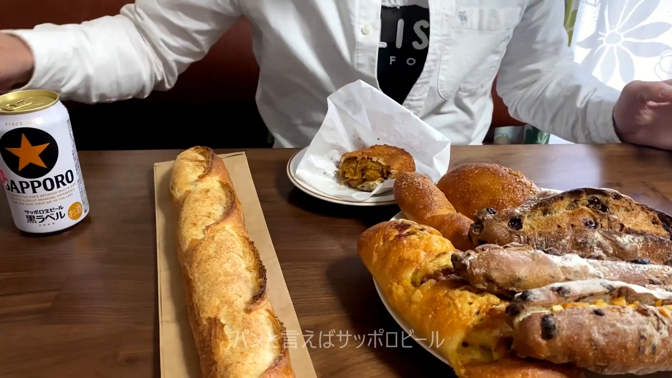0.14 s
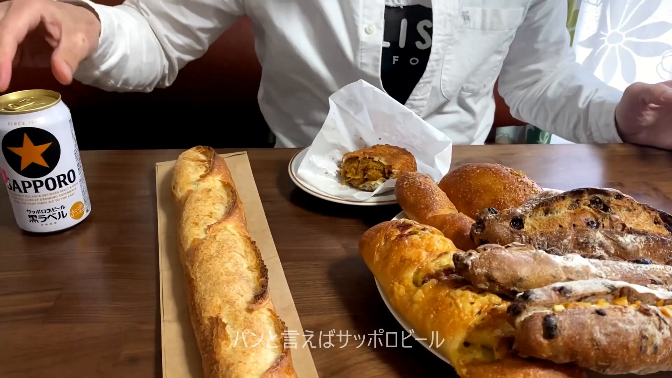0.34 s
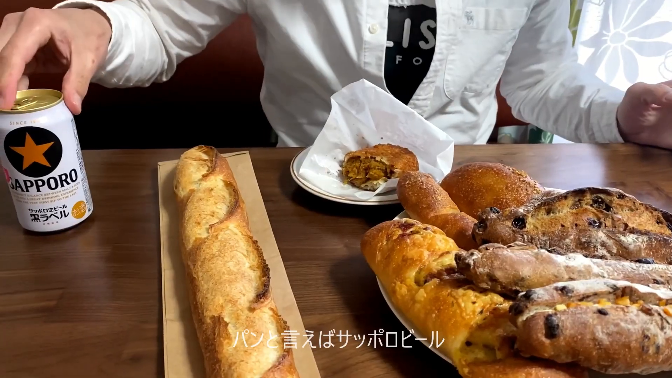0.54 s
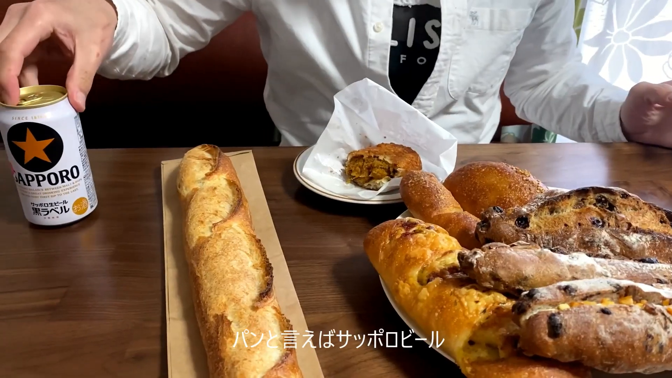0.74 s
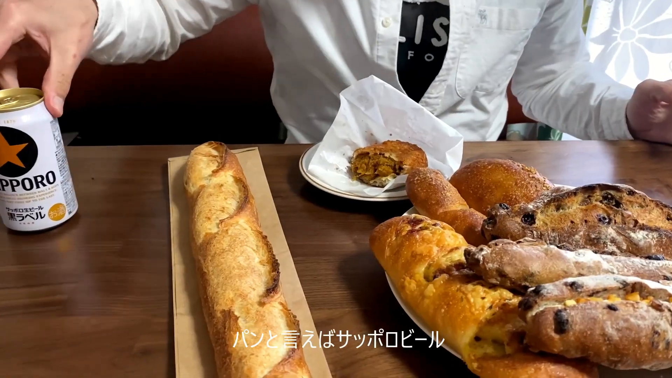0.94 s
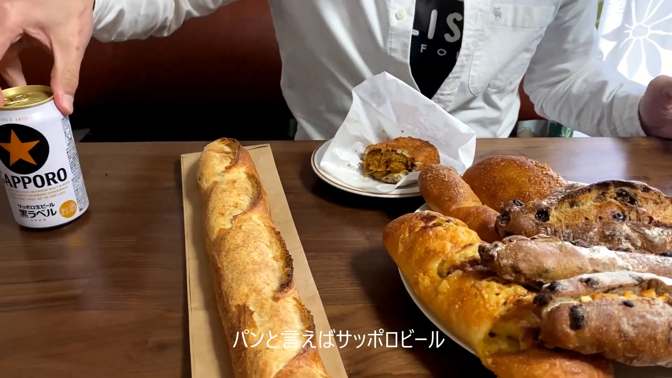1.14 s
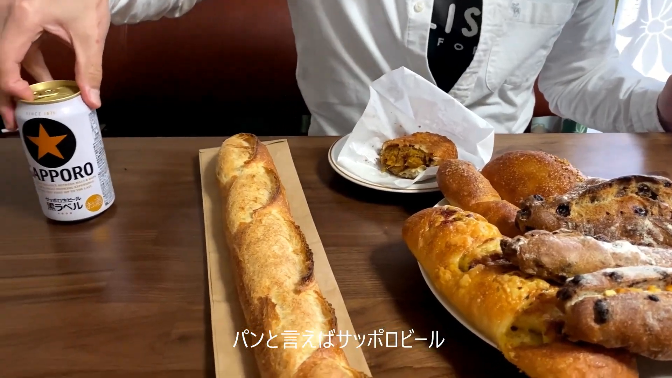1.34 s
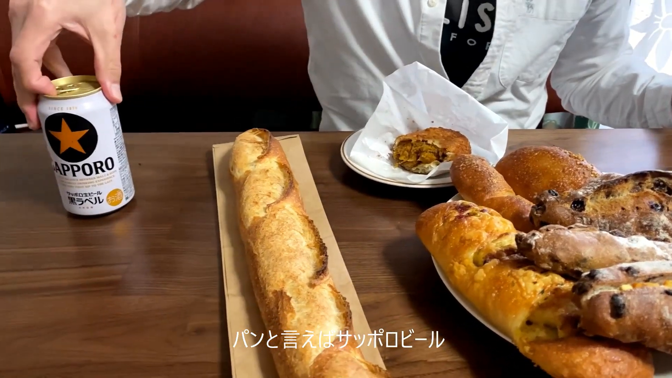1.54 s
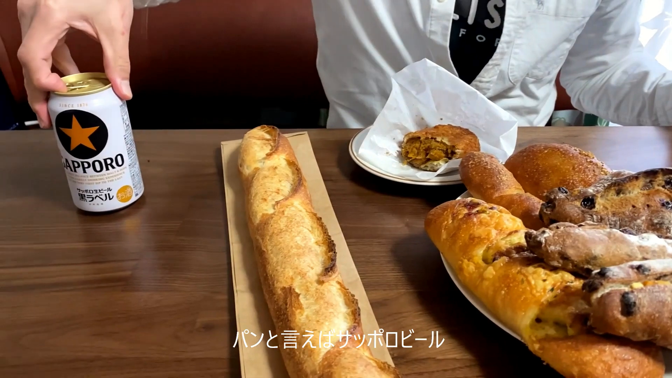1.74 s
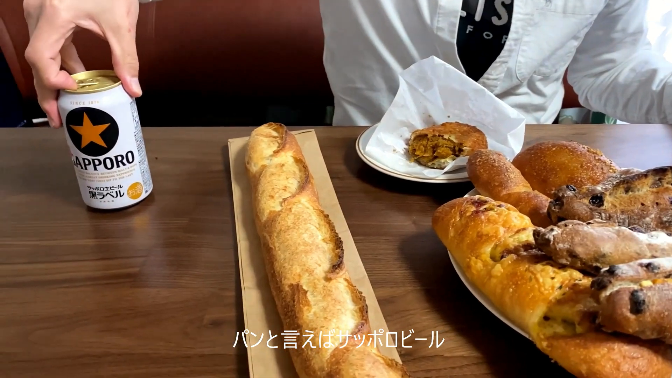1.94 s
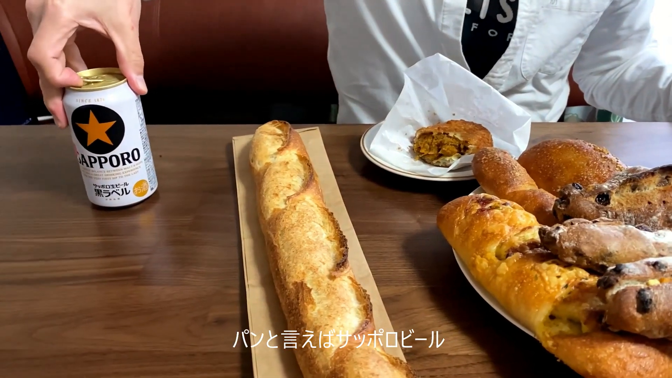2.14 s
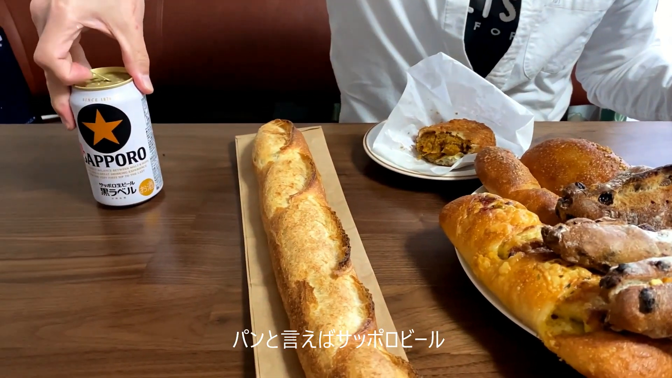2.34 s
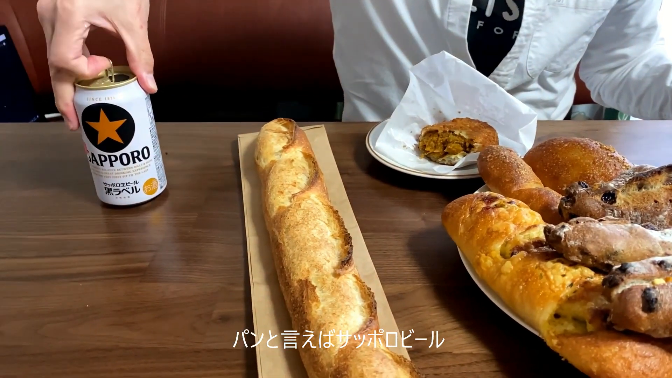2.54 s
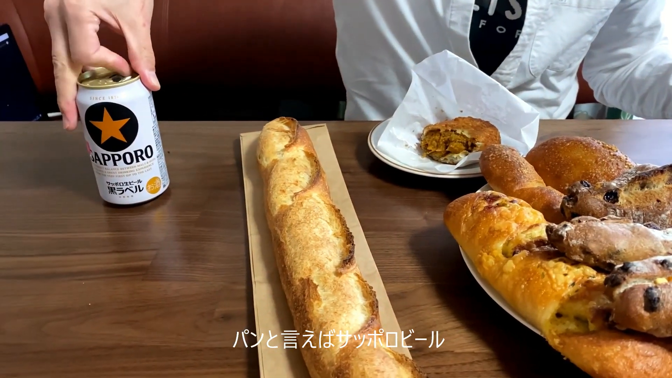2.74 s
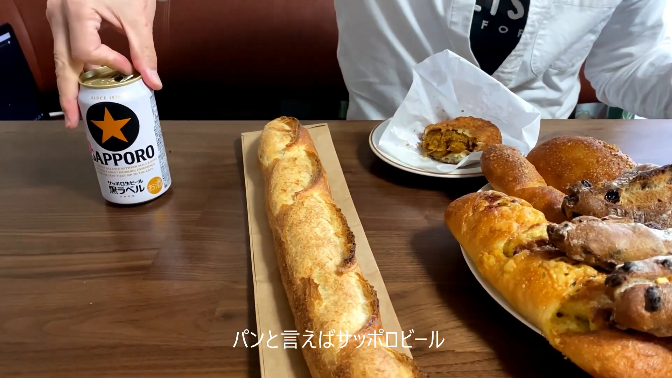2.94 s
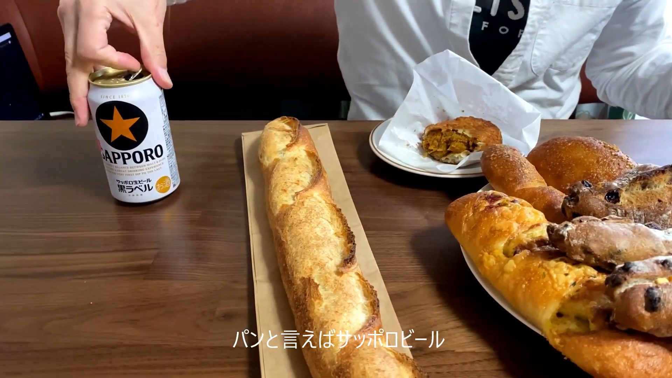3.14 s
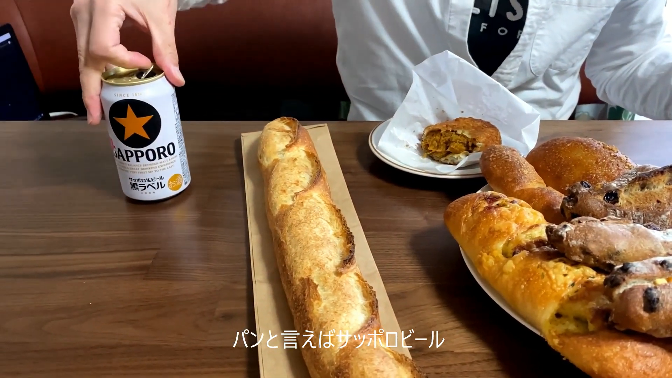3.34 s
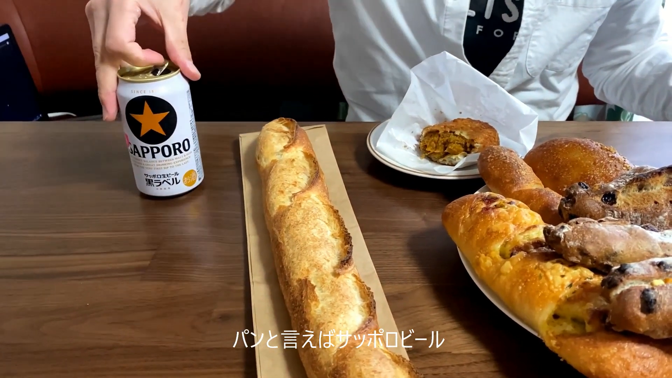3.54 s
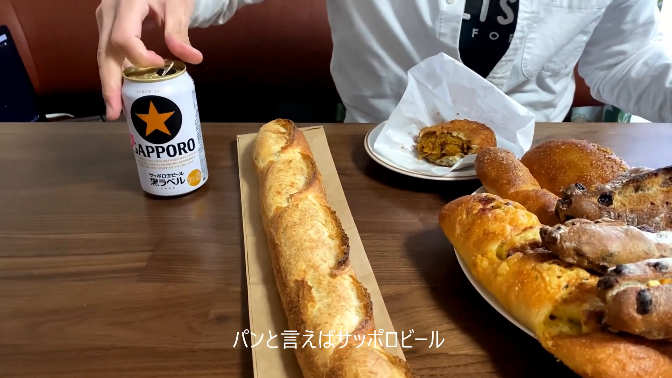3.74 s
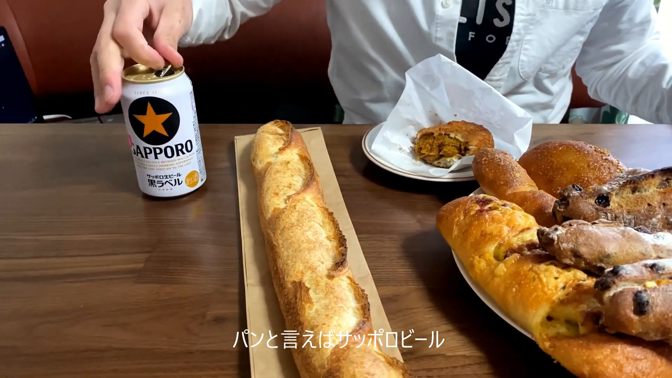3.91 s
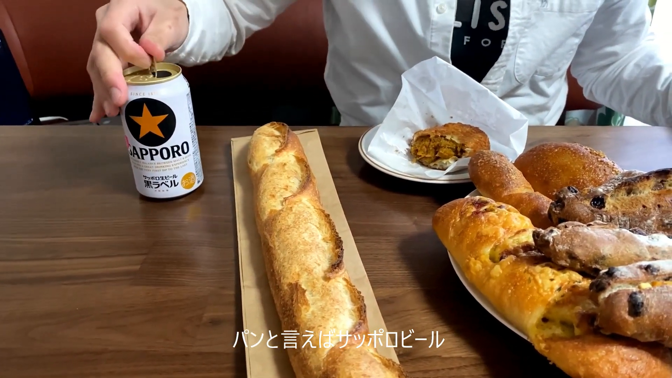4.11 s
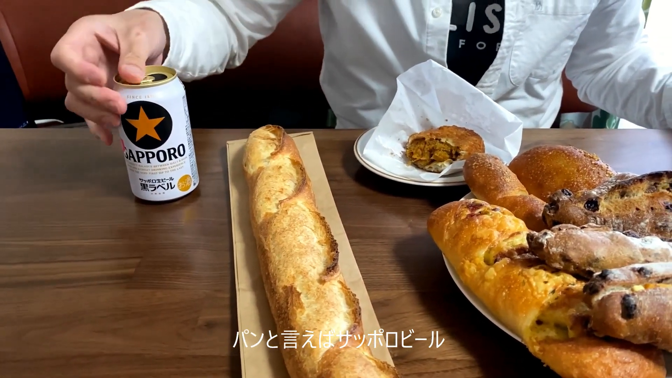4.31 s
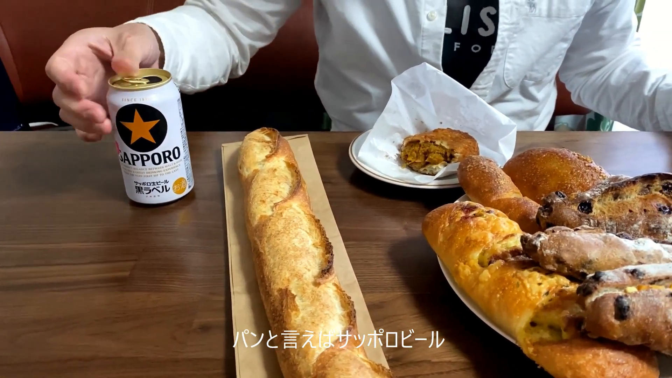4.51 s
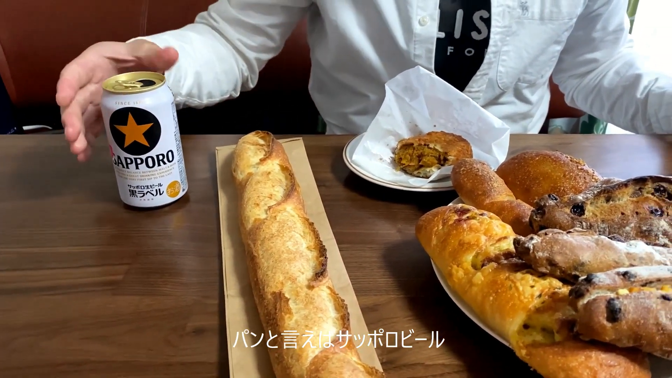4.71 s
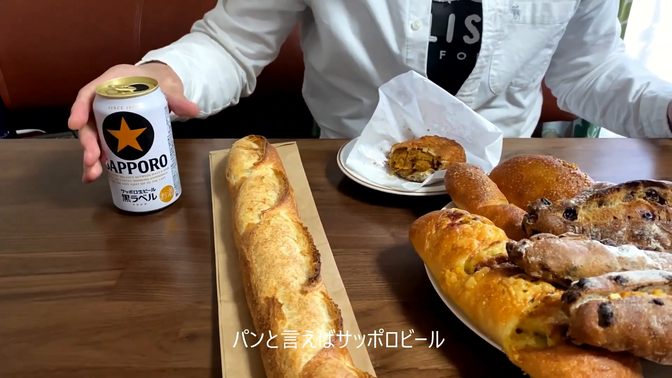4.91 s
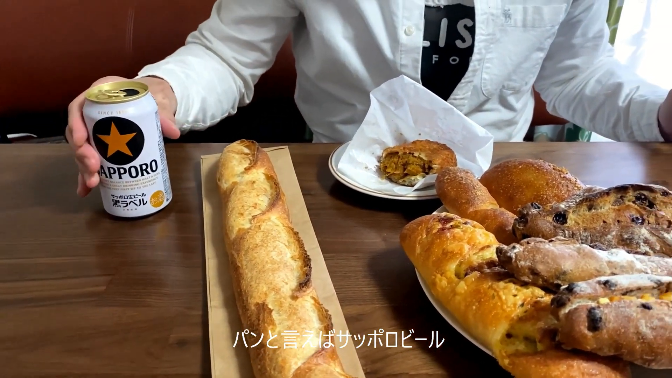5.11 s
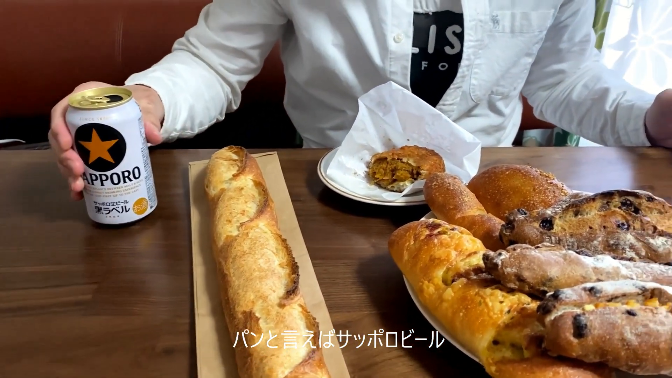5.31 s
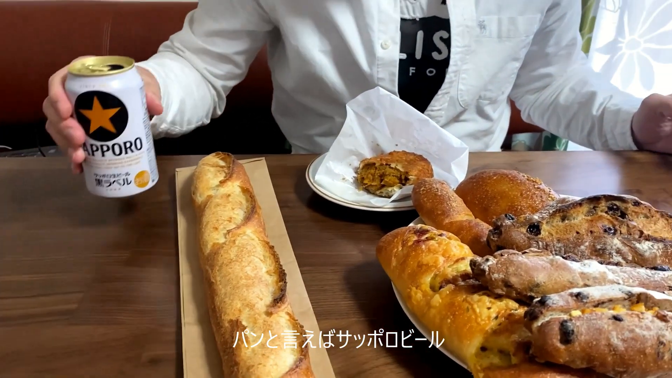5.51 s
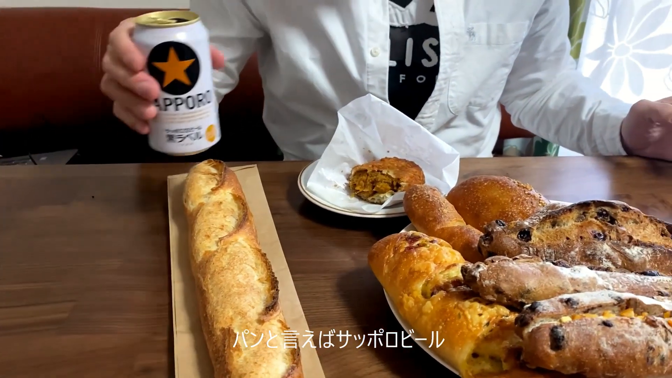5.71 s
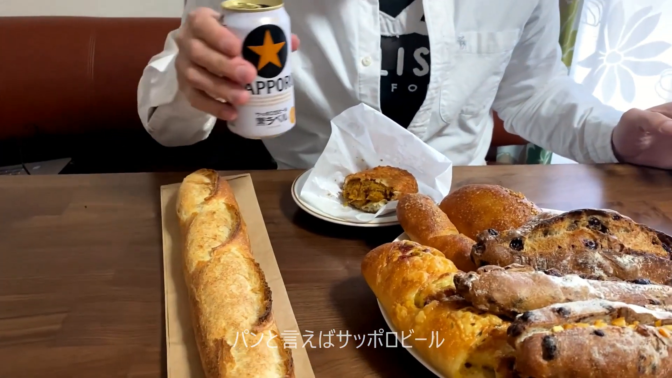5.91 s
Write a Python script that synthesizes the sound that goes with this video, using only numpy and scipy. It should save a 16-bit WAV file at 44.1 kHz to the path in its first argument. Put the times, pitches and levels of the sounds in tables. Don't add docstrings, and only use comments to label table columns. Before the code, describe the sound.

A full drinks can is handled on a wooden table in a small quiet room. Light ticks and a short gritty scrape come first, then soft thumps. The tab ticks, a very brief hiss bursts out, and the lid cracks twice with a ringing metallic snap and a table thud. A faint slide, finger taps and a small click follow. Close stereo phone microphone.

```python
import sys
import numpy as np
from scipy import signal
from scipy.fft import rfft, irfft
from scipy.io import wavfile
from scipy.ndimage import uniform_filter1d

SR = 44100
rng = np.random.default_rng(int(sys.argv[2]) if len(sys.argv) > 2 else 0)


def volts_from_db(level):
    exponent = np.asarray(level, float) / 20
    return 10 ** exponent


def inscribe(sig):
    pcm = np.round(np.clip(np.atleast_2d(sig).T, -1, 1) * 32767)
    wavfile.write(sys.argv[1], SR, pcm.astype(np.int16))


N = 267157


def unit(x):
    return x / np.sqrt(np.mean(x ** 2))


def unit_energy(x):
    return x / np.sqrt(np.sum(x ** 2))


def band(x, hz, width_hz):
    return signal.lfilter(*signal.iirpeak(min(hz, 0.45 * SR), hz / width_hz, SR), x)


def cut(x, lo_hz, hi_hz):
    return signal.sosfilt(signal.butter(3, [lo_hz, hi_hz], "band", fs=SR, output="sos"), x)


def colour(x, points):
    hz, db = np.transpose(points)
    log_f = np.log(np.arange(N // 2 + 1) * SR / N + 1)
    return irfft(rfft(x) * volts_from_db(np.interp(log_f, np.log(hz), db)), N)


def curve(s, db):
    return volts_from_db(np.interp(np.arange(N) / SR, s, db, left=-150, right=-150))


def walk(rate_hz):
    hold = int(SR / rate_hz)
    steps = np.repeat(rng.standard_normal(N // hold + 1), hold)
    return 1.6 * uniform_filter1d(uniform_filter1d(steps, hold), hold)[:N]


def add(out, s, x):
    i = int(s * SR)
    out[i:i + len(x)] += x[:N - i]


def ring(modes, size=8192):
    t = np.arange(size) / SR
    return unit_energy(sum(volts_from_db(db - 60 * t / t60_s) * np.sin(2 * np.pi * hz * t) for hz, db, t60_s in modes))


def burst(ms, size=1024):
    sign, spread = rng.standard_normal((2, size))
    decay = np.exp(-np.arange(size) / (ms * SR / 1000))
    return unit_energy(sign * volts_from_db(2.1 * spread) * decay)


def strike(ms, modes, spread=0.045, count=5):
    out = 0
    for hz, db, t60_s in modes:
        detune = rng.standard_normal((count, 2))
        crowd = ring([(hz * (1 + spread * a), 3 * b, t60_s) for a, b in detune], size=2560)
        out = out + volts_from_db(db) * unit_energy(signal.fftconvolve(burst(ms), band(crowd, hz, hz * 0.61)))
    return out


def snap(ms):
    edge = cut(burst(ms), 4800, 17000)
    return edge + 1.2 * band(edge, 8700, 4300)


def stroke(start, end, start_db, end_db, rise_db_s, fall_db_s):
    times_s = [start - 60 / rise_db_s, start, max(end, start + 1 / SR), end + 60 / fall_db_s]
    return curve(times_s, [start_db - 58, start_db, end_db, end_db - 60.5])


def glide(points, waver_hz):
    s, hz, db = np.transpose(points)
    phase = 2 * np.pi * np.cumsum(np.interp(np.arange(N) / SR, s, hz)) / SR
    return curve(s, db) * walk(waver_hz) * np.sin(phase)


def air():
    # f/Hz, density/dB
    air_spectrum = [(20, -30.5), (50, -3), (102, -16.5), (256, -13), (480, -22), (2550, -30), (3000, -38),
                    (16000, -57.5)]
    hiss = np.array([colour(rng.standard_normal(N), air_spectrum) for _ in range(2)])
    tone = volts_from_db(-65.5) * unit(hiss)
    bass_gain = volts_from_db(2.5 * walk(9) - 1.5)
    return tone + (bass_gain - 1) * cut(tone, 32, 600)


def arm():
    # centre t/s, spread/s, level/dB
    arm_leans = [
        (0, 0.11, -70.5),
        (0.588, 0.069, -65),
        (1.04, 0.088, -63.5),
        (1.47, 0.084, -52.5),
        (2.63, .16, -54),
        (3.35, .2, -68.5),
        (4.3, 0.34, -67),
    ]
    t = np.arange(N) / SR
    weight = volts_from_db(-73)
    for s, spread_s, db in arm_leans:
        weight = weight + volts_from_db(db) * np.exp(-0.5 * ((t - s) / spread_s) ** 2)
    return weight * unit(cut(rng.standard_normal(N), 35, 160))


def ticks():
    # t/s, peak/dB, ring f/Hz, bright crack re peak/dB, t60/s
    tick_table = [(0.4542, -46, 2150, -31, 0.017), (0.5237, -45.5, 2950, -22, 0.043),
                  (.6673, -45.5, 3820, 3, 0.018), (0.7353, -47, 4060, -7, .014),
                  (1.147, -65, 4750, 0, 0.0089), (2.262, -56, 1980, -35, .015),
                  (2.287, -65, 4000, -30, .02), (2.3014, -30, 3679, -20, .05),
                  (3.3543, -51, 1620, -27, .02), (3.9472, -48.5, 2910, -11, 0.016),
                  (4.2095, -52, 1400, -29.5, 0.018), (4.4347, -46.5, 1100, 10.5, 0.06),
                  (4.4436, -48.5, 2800, -5, .003), (4.49, -47.5, 2600, -25, .012),
                  (4.4951, -52, 3080, -25, 0.0072), (4.5005, -45.5, 2740, -14, 0.011),
                  (4.5, -42.5, 4120, -18, 0.043), (4.5704, -72, 3940, -1, .015),
                  (4.6133, -39.5, 940, -22.5, 0.15), (4.6120, -57.5, 3315, -22, 0.068),
                  (5.1117, -51, 1498, -9, 0.0056), (5.1117, -64, 3500, -20, 0.0051),
                  (3.953, -50, 1200, -30, 0.059), (5.9624, -47, 702, -28, 0.03)]
    out = np.zeros(N)
    for s, db, hz, bright_db, t60_s in tick_table:
        wall = [(hz, 0, t60_s), (hz * 0.75, -4, t60_s * 0.4),
                (hz * 0.33, -14, t60_s * 0.15), (hz * 1.24, -7, t60_s * 0.2)]
        add(out, s, volts_from_db(db + 12.5) * strike(0.801, wall, spread=0.014, count=3))
        add(out, s, volts_from_db(db + bright_db + 10) * snap(1.0))
    return out


def scrape():
    # f/Hz, width/Hz, level/dB
    scrape_peaks = [
        [(2918, 650, 0), (3830, 190, -9.5), (4940, 840, -5.5), (5782, 1500, -14.5)],
        [(1186, 190, 2), (1476, 310, 4), (1850, 220, -1), (2306, 370, 0)],
        [(7190, 1300, 0.013), (10230, 3630, 1), (14670, 2500, -0.47)],
        [(230, 160, -2.5), (347.5, 40, -2.5), (455.4, 97, -1), (687, 180, -4)],
    ]
    grains = rng.standard_normal((4, N)) * volts_from_db(2.0 * rng.exponential(size=(4, N))) * volts_from_db(1.1 * walk(40))
    parts = []
    for g, peaks in zip(grains, scrape_peaks):
        parts.append(unit(sum(volts_from_db(db) * band(band(g, hz, w), hz, w) / np.sqrt(w) for hz, w, db in peaks)))
    return parts


def drags(wall, lid, grit, table):
    # start t/s, end t/s, start level/dB, end level/dB, weight on table/dB
    drag_strokes = [
        (0.696, 0.761, -75, -72.5, 2.5),
        (0.937, 1.038, -62.5, -60.5, -0.5),
        (1.34, 1.509, -83.5, -78, 8),
        (3.169, 3.641, -79.5, -70, 3.5),
    ]
    rise_db_s, fall_db_s = 315, 199
    lid_db, grit_db, table_db = 5, -2, 13
    slow_grit_db_s = -14.5
    out = np.zeros(N)
    for start, end, start_db, end_db, weight_db in drag_strokes:
        body = wall + volts_from_db(lid_db) * lid
        body = body + volts_from_db(grit_db + slow_grit_db_s * (end - start)) * grit
        body = body + volts_from_db(table_db + weight_db) * table
        out += stroke(start, end, start_db, end_db, rise_db_s, fall_db_s) * body
    return out


def flicks():
    # t/s, peak/dB, centre f/Hz
    flick_table = [(1.1468, -41.5, 12000), (1.822, -62, 9000), (1.832, -68, 7000), (1.841, -63, 9000),
                   (2.024, -69, 9000), (2.050, -60.5, 8000), (2.067, -62.5, 8000), (2.078, -66.5, 10000),
                   (4.040, -65, 10000), (4.571, -69, 8000), (6.012, -62, 5980), (6.016, -47, 11100)]
    out = np.zeros(N)
    for s, db, hz in flick_table:
        add(out, s, volts_from_db(db + 16) * band(cut(burst(0.76), 4500, 17000), hz, hz * 1.1))
    return out


def knocks():
    # t/s, peak/dB, f/Hz, t60/s
    knock_table = [(1.329, -43.5, 72.5, 0.048), (1.36, -44, 101, 0.045), (1.404, -38, 112, 0.093),
                   (1.491, -42.5, 97, 0.057), (1.539, -43.5, 101.6, 0.07), (1.99, -52.5, 141, 0.13),
                   (2.098, -41.5, 103, 0.13), (2.315, -43.5, 95, 0.16), (2.361, -46, 214.5, 0.14),
                   (2.52, -39, 135.3, 0.3), (2.58, -21.5, 128, 0.13), (2.585, -32, 283.8, .2),
                   (4.613, -53, 416, 0.065), (2.817, -42, 181.3, 0.069), (2.838, -38, 114.9, 0.0754),
                   (2.974, -46, 62.3, 0.076), (4.622, -48.5, 110, 0.067), (5.106, -55.5, 194, 0.07),
                   (5.444, -56.5, 190.1, 0.072), (5.96, -57, 201.4, 0.084)]
    out, push = np.zeros(N), np.hanning(200)
    for s, db, hz, t60_s in knock_table:
        modes = [(hz, 0, t60_s), (hz * 0.68, -6, t60_s), (hz * 1.7, -8, t60_s * 0.55)]
        thud = signal.fftconvolve(push, ring(modes))
        add(out, s, volts_from_db(db + 3.5) * thud / np.abs(thud).max())
    return out


def rubs(wall, lid, grit, table):
    # start t/s, end t/s, level/dB, brightness/dB
    rub_strokes = [
        (1.95, 1.969, -90.5, -10),
        (2.272, 2.31, -91, -10),
        (3.712, 3.727, -63, -0.5),
        (3.97, 4.149, -85.5, -1),
        (4.193, 4.237, -78, 2),
        (4.451, 4.485, -83, 14),
        (4.601, 4.625, -76, 6),
        (5.887, 5.89, -85.5, -4),
        (5.967, 5.987, -106, -19),
    ]
    rise_db_s, fall_db_s = 499.5, 350.5
    lid_db, grit_db, table_db = 11, -11, 7.5
    out = np.zeros(N)
    for start, end, db, bright_db in rub_strokes:
        body = wall + volts_from_db(lid_db - bright_db) * lid
        body = body + volts_from_db(grit_db + bright_db) * grit
        body = body + volts_from_db(table_db - bright_db) * table
        out += stroke(start, end, db, db, rise_db_s, fall_db_s) * body
    return out


def jet():
    # t/s, level/dB
    jet_envelope = [
        (2.300, -70),
        (2.312, -53),
        (2.318, -29),
        (2.34, -24),
        (2.366, -19),
        (2.376, -39),
        (2.39, -51.5),
        (2.41, -79.5),
    ]
    # f/Hz, level/dB
    jet_spectrum = [(500, -24.5), (2000, -21), (4000, -20.5), (6500, -5.5), (8500, -6.5), (11000, -1),
                    (15000, -2.5), (17000, -18.5)]
    gas = unit(colour(rng.standard_normal(N), jet_spectrum))
    return curve(*np.transpose(jet_envelope)) * volts_from_db(2.0 * walk(300)) * gas


def cracks(events, lid, panel):
    out = np.zeros(N)
    for s, lid_db, panel_db, bright_db, ms in events:
        add(out, s, volts_from_db(lid_db + 15.5) * strike(ms, lid))
        add(out, s, volts_from_db(panel_db + 14.5) * strike(ms, panel))
        add(out, s, volts_from_db(bright_db + 17) * snap(ms))
    return out


def vent():
    # t/s, lid/dB, panel/dB, bright crack/dB, burst/ms
    vent_cracks = [
        (2.3012, -48.5, -29.5, -32, 1.1),
        (2.3690, -25, -18, -26.5, 1.5),
        (2.3718, -17, -11, -32, 2.2),
        (2.3775, -25, -24.5, -38.5, 3.8),
        (2.388, -26, -27.5, -41, 3),
        (2.413, -33.5, -26, -38.5, 1),
    ]
    # f/Hz, level/dB, t60/s
    tight_modes = [
        [(450, -12.5, 0.014), (1300, -3.5, 0.027), (1540, 1, .02), (1770, 0, .015), (2298, -10, .012)],
        [(3054, -1.5, 0.093), (3530, -2, 0.028), (4980, -6.5, .015)],
    ]
    return cracks(vent_cracks, *tight_modes)


def tear():
    # t/s, lid/dB, panel/dB, bright crack/dB, burst/ms
    tear_cracks = [
        (2.5207, -28, -17.5, -16, 2.5),
        (2.5680, -26.5, -38, -42, 2.3),
        (2.5735, -18.5, -15, -16, 2.7),
        (2.5770, -15, -19, -14, 2.4),
        (2.5815, -14.5, -25, -23.5, 5),
        (2.5915, -18.5, -31, -34.5, 1.5),
        (2.8161, -41, -45, -42, 0.82),
    ]
    # f/Hz, level/dB, t60/s
    slack_modes = [
        [(445, -1.5, 0.016), (670, -8.5, 0.025), (953, -1.5, 0.017), (1154.6, 1.5, 0.027), (1290, 0.5, 0.025), (1595.4, -3, .015), (2030, -1, 0.031)],
        [(2600, -6, 0.0053), (3010, 1, 0.01), (3773, -1.5, 0.022), (4260, -2, 0.0081), (5290, -1, .012)],
    ]
    return cracks(tear_cracks, *slack_modes)


def sing():
    # t/s, f/Hz, level/dB
    sing_path = [
        (3.12, 3230, -89),
        (3.16, 3172, -74.5),
        (3.4, 2955, -75),
        (3.7, 2855, -73.5),
        (3.8, 2870, -100),
    ]
    return glide(sing_path, 110)


def squeak():
    # t/s, f/Hz, level/dB
    squeak_path = [
        (4.14, 10500, -100),
        (4.18, 10800, -91),
        (4.22, 10900, -88),
        (4.235, 10800, -100),
    ]
    return glide(squeak_path, 120)


def room(x):
    # f/Hz, t60/s, level/dB
    tail_bands = [(102, 0.33, -12), (298.5, 0.63, -10.5), (935, 0.38, -3.5), (3000, .4, -5),
                  (6600, 0.38, -14.5), (12804, 0.19, -22.5)]
    # delay/ms, level/dB
    near_echoes = [
        (8.5, -8.5),
        (17.3, -16),
        (31.5, -20.5),
    ]
    t = np.arange(SR) / SR
    tail = np.zeros((2, SR))
    for hz, t60_s, db in tail_bands:
        noise = unit(band(band(rng.standard_normal((2, SR)), hz, hz), hz, hz))
        tail += volts_from_db(db - 60 * t / t60_s) * noise * np.sqrt(hz / t60_s) / SR * 8
    tail *= np.clip(t / 0.006, 0, 1)
    tail[:, 0] += 1
    for delay_ms, db in near_echoes:
        smear = cut(rng.standard_normal((2, 64)) * np.hanning(64), 3200, 21000) / 5
        i = int(delay_ms * SR / 1000)
        tail[:, i:i + 64] += volts_from_db(db) * smear
    return signal.fftconvolve(x[None], tail, axes=1)[:, :N]


def scene():
    parts = scrape()
    handling = arm() + ticks() + drags(*parts) + flicks() + knocks() + rubs(*parts)
    opening = vent() + jet() + tear()
    return room(handling + opening + sing() + squeak()) + air()


def roll_off(x):
    return signal.sosfilt(signal.butter(12, 16780, fs=SR, output="sos"), x)


def record(dry):
    # f/Hz, likeness 0-1, left minus right/dB
    port_match = [(60, 0.91, 0), (350.7, 1, 2.5), (1400, 0, 0.5), (2750, 0.6, 3), (5316, 0.7, 4),
                  (6500, .75, 2.5), (9000, .93, -1.5), (13300, .92, 1)]
    # f/Hz, lead/rad
    right_lead = [(150, -.2), (345, -1.1), (1400, -1.8), (2400, -1.4), (4500, -.2), (6700, -.3),
                  (9050, 3.14), (15900, 12.8)]
    f = np.arange(N // 2 + 1) * SR / N
    hz, like, lean_db = np.transpose(port_match)
    like = np.clip(np.interp(f, hz, like), 0, 1)
    lean_db = np.interp(f, hz, lean_db)
    left, other = rfft(dry)
    phase = np.interp(f, *np.transpose(right_lead)) - np.arccos(like)
    right = (like * left + 1j * np.sqrt(1 - like ** 2) * other) * np.exp(1j * phase)
    ports = irfft(np.array([left * volts_from_db(lean_db / 2), right * volts_from_db(-lean_db / 2)]), N)
    ports = signal.sosfilt(signal.butter(4, 48, "high", fs=SR, output="sos"), ports)
    ports = signal.sosfilt(signal.ellip(8, 0.2, 50, 15900, fs=SR, output="sos"), ports)
    return roll_off(ports)


dry = scene()
out = record(dry)
inscribe(out)
```